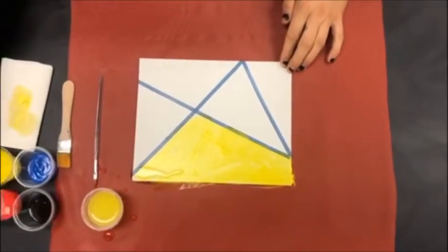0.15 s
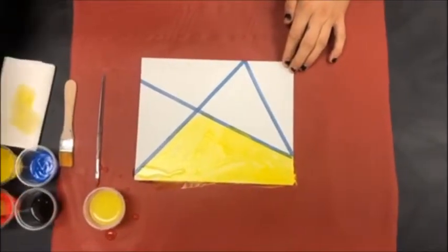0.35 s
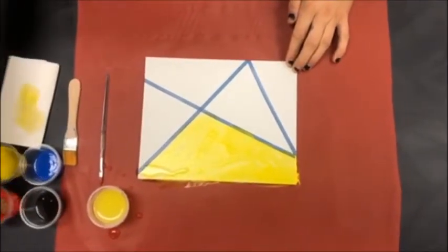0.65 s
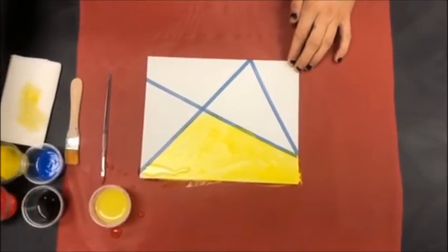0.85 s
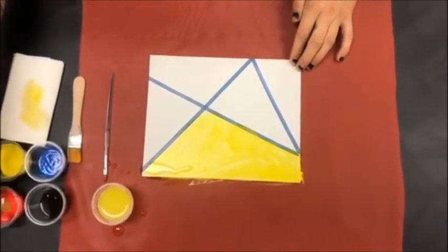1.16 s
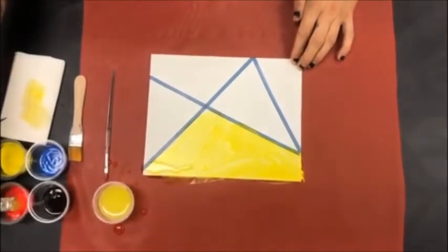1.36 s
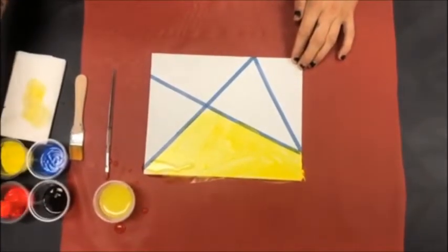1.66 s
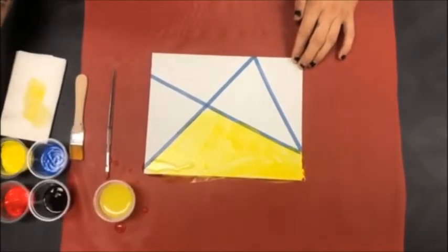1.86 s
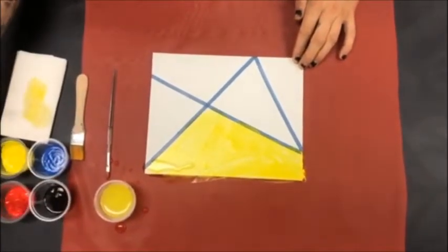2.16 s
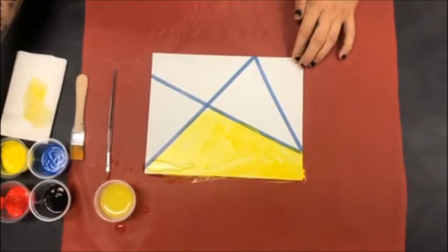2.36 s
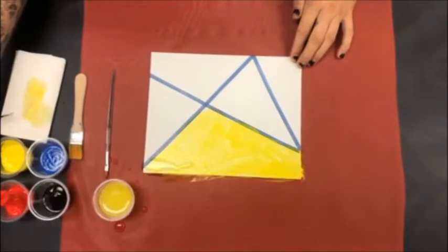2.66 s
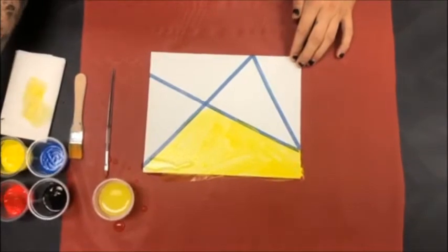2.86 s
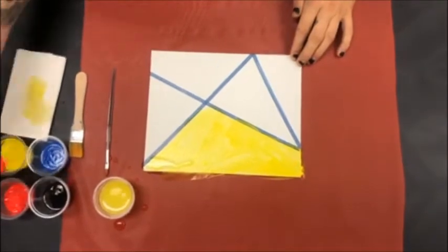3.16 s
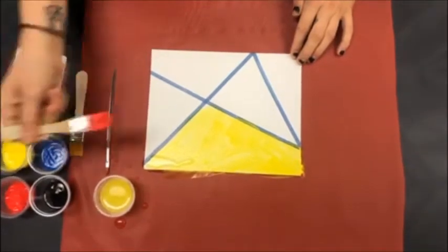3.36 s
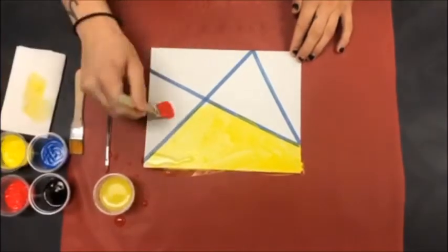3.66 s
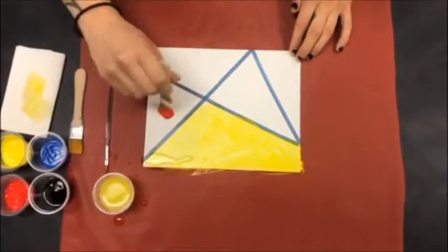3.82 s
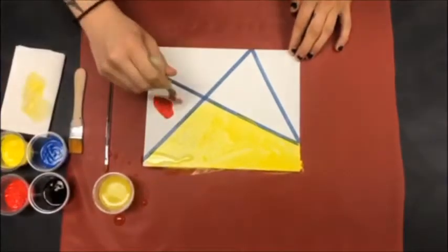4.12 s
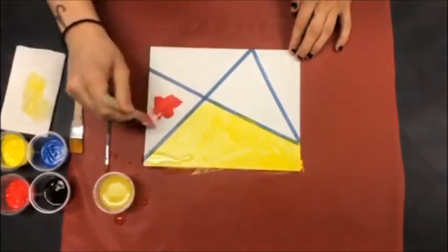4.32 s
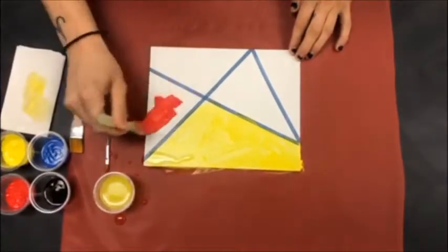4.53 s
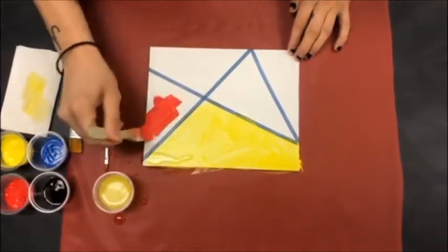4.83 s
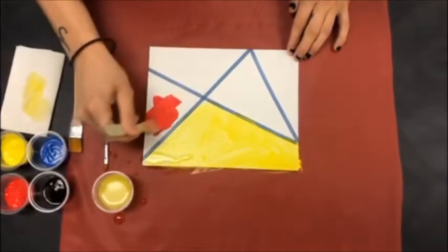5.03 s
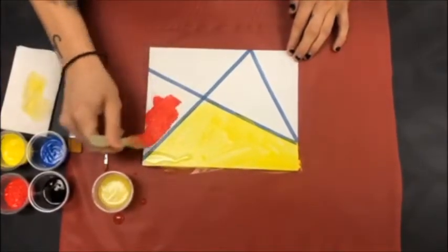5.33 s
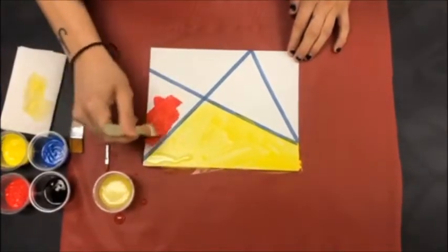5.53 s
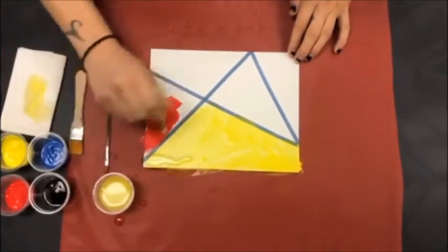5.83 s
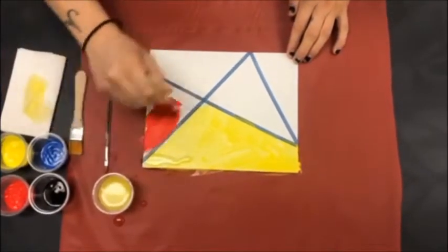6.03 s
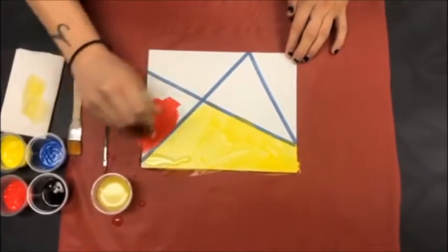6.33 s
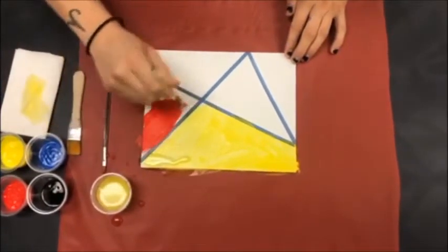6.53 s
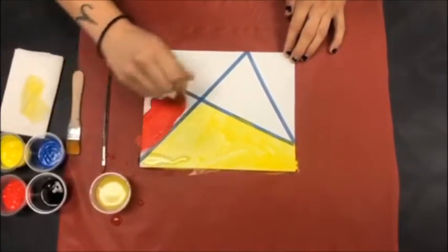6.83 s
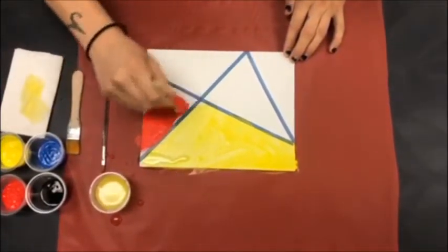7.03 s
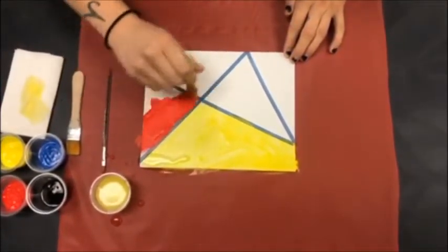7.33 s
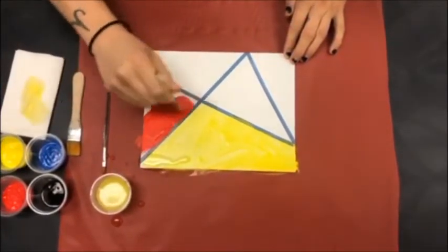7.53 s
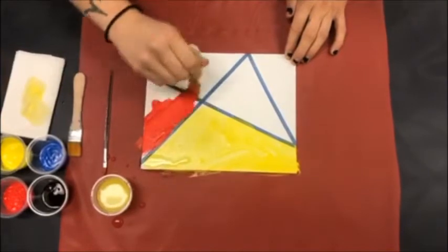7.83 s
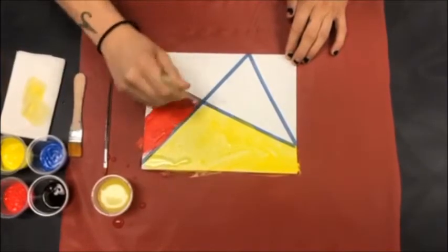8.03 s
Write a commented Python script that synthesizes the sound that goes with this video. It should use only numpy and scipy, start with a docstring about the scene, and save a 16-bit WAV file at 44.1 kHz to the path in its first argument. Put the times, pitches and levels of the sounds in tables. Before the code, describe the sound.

A steady ventilation rumble, low electrical hum and faint hiss fill a small room, with the microphone close to a painting table. From the start until about 1.5 seconds, a plastic paint cup clatters on the tabletop. The loudest sound is a sharp double knock at about 0.4 seconds, with another firm knock near 0.8. Between the knocks, a brush handle ticks lightly on the rim and the brush scrapes grittily inside. Tiny squeaks come near 1.2 and 2.2 seconds, and two faint scrapes just before 3. An arm swishes, barely audible, from about 2.4 to 3.8 seconds. From around 3.7 seconds to the end, just past 8, a wet brush makes faint, irregular dabs and short strokes on canvas, the bristles catching with a thin, high squeak. A light, clear tick stands out at 4.8 seconds, with a softer one at 5.1.

```python
"""A small room, one microphone close to a painting table. Ventilation rumbles under a low mains hum.
A plastic paint cup is knocked down and clatters, ringing the table top; a brush handle ticks on its
rim, and scrapes and squeaks come from the cup as surfaces stick and slip. An arm swishes over, then
the loaded brush dabs and strokes the canvas, its wet bristles catching on the weave and singing."""
import sys
import numpy as np
from scipy import signal
from scipy.fft import rfft, irfft
from scipy.io import wavfile
from scipy.ndimage import uniform_filter1d

SR = 44100
rng = np.random.default_rng(int(sys.argv[2]) if len(sys.argv) > 2 else 0)


def master_out(mix):
    """Clip the mix to full scale and print it as 16-bit PCM to the path in sys.argv[1]."""
    frames = np.transpose(np.atleast_2d(mix))
    ceiling = np.clip(frames, -1, 1)
    pcm = np.round(ceiling * 32767).astype(np.int16)
    wavfile.write(sys.argv[1], SR, pcm)


N = 360738


def gain_of(db):
    """Decibels to gain."""
    return 10 ** (np.asarray(db) / 20)


def unit_rms(x):
    """Scales to rms 1."""
    return x / np.sqrt(np.mean(x ** 2) + 1e-20)


def curve_at(points, hz):
    """Reads a table along a log-frequency axis."""
    f, value = np.transpose(points)
    return np.interp(np.log(hz + 1), np.log(f + 1), value)


def add(mix, s, sound):
    """Lays a sound into the mix at s seconds."""
    part = mix[max(round(s * SR), 0):][:len(sound)]
    part += sound[:len(part)]


def click(colour, tilt_db=0, size=2048):
    """The causal response of a small body with this colour, tilted about 2 kHz."""
    hz = abs(np.fft.fftfreq(size, 1 / SR))
    octaves = np.log2(np.clip(hz, 300, 9000) / 2000)
    radiated = 1 / np.hypot(1, (129.7 / np.maximum(hz, 20)) ** 2)  # small objects give off little bass
    log_gain = np.log(radiated * gain_of(curve_at(colour, hz) + tilt_db * octaves))
    minimum_phase = np.exp(np.conj(signal.hilbert(log_gain)))
    return np.fft.ifft(minimum_phase).real[:size // 2]


def friction(colour, slips_per_s, spread_db):
    """Many tiny slips of uneven size, each ringing the body; rms 1."""
    sizes = gain_of(spread_db * np.minimum(rng.exponential(1, N), 4)) * rng.choice([-1, 1], N)
    slips = sizes * (rng.random(N) < slips_per_s / SR)
    return unit_rms(signal.oaconvolve(slips, click(colour))[:N])


def sing(hz, waver_hz):
    """Almost regular sticking and slipping, on a wavering pitch; rms 1."""
    waver = unit_rms(uniform_filter1d(rng.standard_normal(N), size=70))
    return np.sqrt(2) * np.sin(2 * np.pi * np.cumsum(hz + waver_hz * waver) / SR)


def blend(noise, tone, share):
    """Gives the tone this share of the power."""
    return np.sqrt(1 - share) * noise + np.sqrt(share) * tone


def arch(s, length, db):
    """The envelope of a movement that gathers speed and slows again."""
    return gain_of(db) * np.sin(np.pi * np.clip((np.arange(N) / SR - s) / length, 0, 1))


def rub(row, grit, body, rise_s, fall_s):
    """A contact presses in, swells or eases, and lifts off; a harder push sounds the body beneath."""
    s, length, db, swell_db, push_db = row
    t = np.arange(SR // 2) / SR
    attack = np.sin(np.pi / 2 * np.minimum(t / rise_s, 1))
    level = gain_of(db + swell_db * (np.minimum(t / length, 1) - .5))
    release = np.exp(-np.maximum(t - length, 0) / fall_s)
    force = np.zeros(N)
    add(force, s, level * attack * release)
    return force * (grit + gain_of(push_db) * body)


def blows(rows, colour, modes, rattle, rattle_growth, rattle_s, graze_db):
    """Each blow is a light graze, a sharp click, a brief rattle of the contact, and ringing modes."""
    out, t = np.zeros(N), np.arange(SR // 5) / SR
    ring = sum(gain_of(db - 60 * t / t60) * np.sin(2 * np.pi * hz * t) for hz, db, t60 in modes)
    for s, db, tilt_db in rows:
        chatter = rattle * gain_of(rattle_growth * (db + 33.5))  # harder blows rattle more
        force = chatter * rng.standard_normal(len(t)) * np.exp(-t / rattle_s)
        force[0] = 1  # the impact itself
        hit = signal.fftconvolve(force, click(colour, tilt_db))[:len(t)]
        hit /= abs(hit).max()
        add(out, s - .0028, gain_of(db + graze_db) * hit)  # an edge grazes just before the blow lands
        add(out, s, gain_of(db) * (hit + ring))
    return out


def bend(x, dispersion_s):
    """Bending waves in the table top: the lower the note, the later it arrives."""
    hz = np.maximum(np.fft.rfftfreq(len(x), 1 / SR), 150)
    lag_s = dispersion_s * np.maximum(np.sqrt(2000 / hz) - np.sqrt(2000 / 2800), 0)
    phase = 2 * np.pi * np.cumsum(lag_s) * SR / len(x)
    return irfft(rfft(x) * np.exp(-1j * phase), len(x))


# The steady background of rumble and hiss. Each row: frequency in Hz, relative level in dB.
BACKGROUND_COLOUR = [(20, -50), (44, -16.5), (56, -1), (100, -7), (160, -9.5), (250, -14), (370, -17.5),
                     (440, -25.5), (720, -28), (950, -35), (1700, -40), (4500, -45), (9000, -50.5),
                     (14000, -53.5)]
# Ventilation resonances, the microphone's ring near 2.5 kHz and the recorder's high hiss.
# Each row: centre in Hz, width in Hz, lift in dB.
BACKGROUND_PEAKS = [(55, 4.8, -3.5), (81.7, 2.6, 7.5), (134.3, 12, 6), (188, 3.8, 0.5), (212.9, 3.5, 7),
                    (266.7, 9.2, 9), (324, 6.2, 10), (347.3, 10, 8), (395.7, 3.8, 10), (1308, 91, 4.5),
                    (2460, 306, 7.5), (3890, 210, 3), (8830, 160, 2.5), (9550, 160, 3.5), (14920, 340, 16)]
def background(noise_db=-51, hum_db=-46.5, hum_hz=120.17):
    """Ventilation rumble with its resonances, faint hiss, and a steady mains hum."""
    hz = np.fft.rfftfreq(N, 1 / SR)
    peaks_db = sum(db * np.exp(-((hz - f) / width) ** 2) for f, width, db in BACKGROUND_PEAKS)
    spectrum = rfft(rng.standard_normal(N)) * gain_of(curve_at(BACKGROUND_COLOUR, hz) + peaks_db)
    noise = unit_rms(irfft(spectrum, N))
    hum = unit_rms(np.sin(2 * np.pi * (hum_hz * np.arange(N) / SR + rng.random())))
    return gain_of(noise_db) * noise + gain_of(hum_db) * hum


# The arm, faint at the microphone. Each row: start in seconds, length in seconds, level in dB.
SWISHES = [(2.37, 0.12, -68.5), (2.54, 0.28, -70), (2.83, .17, -71.5), (3.346, .07, -72),
           (3.468, 0.21, -66), (3.69, 0.073, -69), (4.375, .04, -67), (5.38, .15, -71.5)]
# Its soft hiss. Each row: frequency in Hz, relative level in dB.
SWISH_COLOUR = [(500, 7.5), (1500, -4), (3200, 5.5), (4800, -4), (6300, 2), (9000, -8), (14000, -14)]
def arm_swishes():
    """The arm brushes past as it reaches: dense friction that swells and fades."""
    movement = sum(arch(*row) for row in SWISHES)
    return movement * friction(SWISH_COLOUR, slips_per_s=6000, spread_db=5.0)


# Faint squeaks at the cup. Each row: start in seconds, length in seconds, level in dB, pitch in Hz.
SQUEAKS = [(1.18, 0.23, -65, 4020), (2.205, 0.059, -69, 2890)]
def cup_squeaks():
    """Rubbed plastic sticks and slips fast enough to give a pitch."""
    return sum(arch(s, length, db) * sing(hz, waver_hz=274) for s, length, db, hz in SQUEAKS)


# Scraping in and around the cup. Each row: start in seconds, length in seconds, level in dB,
# swell from start to end in dB, push in dB (a boost to the table's sound).
SCRAPES = [(-.01, .06, -52, -11, 5), (0.111, 0.08, -58, -5, 5.5), (0.542, 0.13, -61.5, -20.5, -15),
           (.69, .04, -62, 3, -4), (0.914, 0.18, -65, -4, 14), (1.1, 0.041, -49, 2, 1.5),
           (1.214, 0.076, -51.5, 8, -5), (1.337, 0.073, -58, -6, 3.5), (1.46, 0.051, -62, 0, 9),
           (2.64, 0.051, -61.5, 6, -14), (2.894, 0.045, -59.5, -8, -12)]
# The grit, then the table under it. Each row: frequency in Hz, relative level in dB.
GRIT_COLOUR = [(150, 1.5), (400, -23.5), (800, -6.5), (1250, 4.5), (1700, 2.5), (2500, 7), (2900, -6),
               (3450, -17), (4100, -7), (5200, -28), (8000, -57), (15000, -30.5)]
TABLE_COLOUR = [(40, -33.5), (170, -2), (450, 5), (750, -3.5), (1250, -0.5), (1900, -13), (3000, -28),
                (8000, -41)]
def cup_scrapes():
    """The brush scrapes grittily in the cup, and the table sounds beneath it."""
    grit = friction(GRIT_COLOUR, slips_per_s=2800, spread_db=2.0)
    table = gain_of(-3.5) * friction(TABLE_COLOUR, slips_per_s=980, spread_db=1.0)
    return sum(rub(row, grit, table, rise_s=.018, fall_s=.018) for row in SCRAPES)


# Dabs, close to the microphone. Each row: start in seconds, level in dB,
# push in dB (a boost to the canvas's sound), pitch in Hz.
DABS = [(3.772, -59, -7, 2410), (3.926, -57, 7, 2350), (4.262, -49, -1, 2253), (4.541, -57, 12, 2250),
        (4.574, -60.5, 15, 2430), (4.796, -46.5, 5.5, 2120), (5.081, -46, 4.5, 2026),
        (5.347, -48.5, -7, 2406), (5.627, -55.5, 7, 2330), (5.726, -62, 6.5, 2310),
        (7.11, -46.5, -3.5, 2407), (7.591, -55, 2, 2286), (8.122, -51, -7, 2420)]
# Strokes along the canvas. Each row: start in seconds, length in seconds, level in dB,
# swell from start to end in dB, push in dB.
STROKES = [(3.655, .12, -65.5, 1.5, 8), (3.942, .12, -70, 6, 12), (4.275, 0.094, -61.5, -4, 4.5),
           (4.835, .022, -63.5, -2, 22.5), (6.031, 0.037, -64.5, 9, -1), (6.176, 0.056, -65.5, -1, 0),
           (6.244, 0.057, -61, -3, 12), (6.558, 0.038, -64.5, 1.5, 5), (6.664, 0.044, -59.5, -4, -2),
           (6.755, .025, -66, -3, 9), (6.95, 0.071, -69, 5, 5), (7.12, 0.023, -61, -5, 6),
           (7.181, 0.038, -61.5, 9, -4), (7.338, 0.075, -69.5, -15, -11), (7.443, 0.037, -64.5, 4, -10),
           (7.603, 0.062, -59, -9, -3.5), (7.672, 0.047, -60.5, 2, 4), (7.843, 0.13, -68.5, -2, 5.5),
           (8.145, .04, -61.5, 0, -4)]
# The bristles, then the canvas under them. Each row: frequency in Hz, relative level in dB.
BRISTLE_COLOUR = [(500, -39), (1550, -20.5), (1850, -5), (2060, -1), (2240, -9.5), (2450, 3), (2700, -11),
                  (3300, -20.5), (4500, -34), (7000, -40.5), (15000, -56)]
CANVAS_COLOUR = [(150, 11), (450, -2.5), (1000, 1.5), (1400, 6), (1900, -25), (3000, -44), (8000, -41)]
def brush_on_canvas(dab_s=.0079, settle_s=.075):
    """Wet bristles catch on the weave and sing: short dabs, each on its own pitch, and longer strokes."""
    bristles = friction(BRISTLE_COLOUR, slips_per_s=2800, spread_db=1.0)
    canvas = gain_of(-15) * friction(CANVAS_COLOUR, slips_per_s=2000, spread_db=5.5)
    stroke_song = sing(hz=2445, waver_hz=124.7)
    out = np.zeros(N)
    for s, db, push_db, hz in DABS:
        voice = blend(bristles, sing(hz, waver_hz=188), share=.4)
        out += rub((s, dab_s, db, 0, push_db), voice, canvas, rise_s=.0035, fall_s=.0082)
    for row in STROKES:
        settled = 1 - np.exp(-(row[1] / settle_s) ** 2)  # the longer the stroke, the more it sings
        voice = blend(bristles, stroke_song, share=.6 * settled)
        out += rub(row, voice, canvas, rise_s=.0072, fall_s=.008)
    return out


# Light ticks at the cup. Each row: start in seconds, level in dB, brightness in dB per octave.
TICKS = [(.0975, -36.5, 2.5), (.1716, -39, -6.5), (.2205, -49, 5), (.3518, -36, -2), (.4155, -31.5, -2.5),
         (.578, -34.5, -6.5), (.6045, -44.5, -3), (.6191, -39, -2.5), (.6836, -30.5, -3), (.749, -37, 1),
         (.9498, -32.5, -5), (.9885, -27.5, -7), (1.0385, -36, -5), (1.0761, -35, -7), (1.122, -48, -12),
         (1.4133, -35, 0.5), (1.4447, -31.5, -2), (4.8283, -33.5, -1.5), (5.1285, -41, -10)]
# The click of a tick. Each row: frequency in Hz, relative level in dB.
TICK_COLOUR = [(200, -27), (800, -24), (1500, -13), (2000, -1), (2480, 5), (3100, -17.5), (4100, -15.5),
               (6500, -31), (9000, -44), (15000, -42)]
# The cup's wall. Each row: pitch in Hz, level against the click in dB, seconds to fall 60 dB.
CUP_MODES = [(2000, -23.5, 0.048), (2540, -25, 0.078)]
def handle_ticks():
    """The brush handle and the cup's rim tick, and the thin wall rings."""
    ticks = blows(TICKS, TICK_COLOUR, CUP_MODES,
                  rattle=.21, rattle_growth=.7, rattle_s=.0019, graze_db=-16.5)
    return bend(ticks, dispersion_s=.00195)


# The cup on the table, loudest at the microphone.
# Each row: start in seconds, level in dB, brightness in dB per octave.
KNOCKS = [(.0283, -23.5, -1), (.3683, -12.5, -1), (.3752, -10, -3.5), (.4225, -25, -8), (.7364, -33, -5),
          (.7696, -19.5, -4.5), (1.1405, -26, -3.5), (1.3335, -34, 1), (1.4893, -29.5, -4),
          (1.5455, -37, -4)]
# The click of a knock. Each row: frequency in Hz, relative level in dB.
KNOCK_COLOUR = [(30, -54), (90, -9.5), (180, -16), (440, -3.5), (800, -4.5), (1300, 3.5), (1950, 3),
                (2500, -1), (3000, -16.5), (4000, -14), (6500, -40), (8700, -31), (11000, -51),
                (15000, -38)]
# Table and cup together. Each row: pitch in Hz, level against the click in dB, seconds to fall 60 dB.
TABLE_MODES = [(185, -30, 0.37), (456, -25.5, 0.17), (544, -34, 0.19), (725, -59, 0.033), (914, -35, .07),
               (1300, -30, 0.078), (1360, -32, 0.087), (2000, -13.5, 0.013)]
def cup_knocks():
    """The plastic cup clatters on the table in firm blows that ring them both."""
    knocks = blows(KNOCKS, KNOCK_COLOUR, TABLE_MODES,
                   rattle=.087, rattle_growth=.1, rattle_s=.0033, graze_db=-24)
    return bend(knocks, dispersion_s=.00248)


# The small room's decay. Each row: frequency in Hz, seconds to fall 60 dB.
ROOM_T60 = [(150, 0.27), (600, 0.72), (2000, 0.36), (4500, 0.37), (12000, 0.2)]
def room_reflections(x, size=256):
    """Dense reflections that build up within milliseconds, the treble dying first."""
    hz, t, noise = signal.stft(rng.standard_normal(SR * 3 // 4), SR, nperseg=size)
    decay = gain_of(-60 * t / curve_at(ROOM_T60, hz)[:, None])
    tail = signal.istft(noise * decay, SR, nperseg=size)[1]
    tail *= 1 - np.exp(-(np.arange(len(tail)) / SR / .0012) ** 2)
    return signal.fftconvolve(x, tail / np.linalg.norm(tail))[:N]


def scene():
    """At the microphone: the cup's knocks stir the room most; the brush is close and fairly dry."""
    knocks, ticks = cup_knocks(), handle_ticks()
    rubbing = brush_on_canvas() + cup_scrapes() + cup_squeaks() + arm_swishes()
    into_room = gain_of(-10) * knocks + gain_of(-10.5) * ticks + gain_of(-13) * rubbing
    return (knocks + ticks + rubbing + room_reflections(into_room) + background())[None]


def record(dry):
    """The recorder takes one channel, up to 15.8 kHz."""
    lowpass = signal.firwin(511, 15800, window=("kaiser", 9), fs=SR)
    return signal.oaconvolve(dry, lowpass[None], "same")


dry = scene()
out = record(dry)
master_out(out)
```